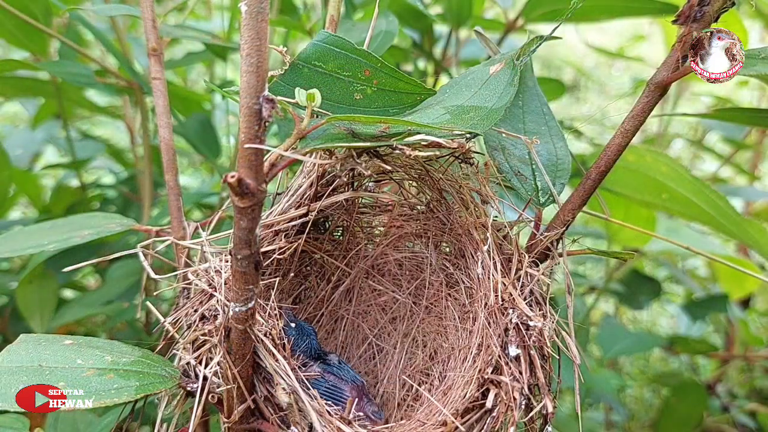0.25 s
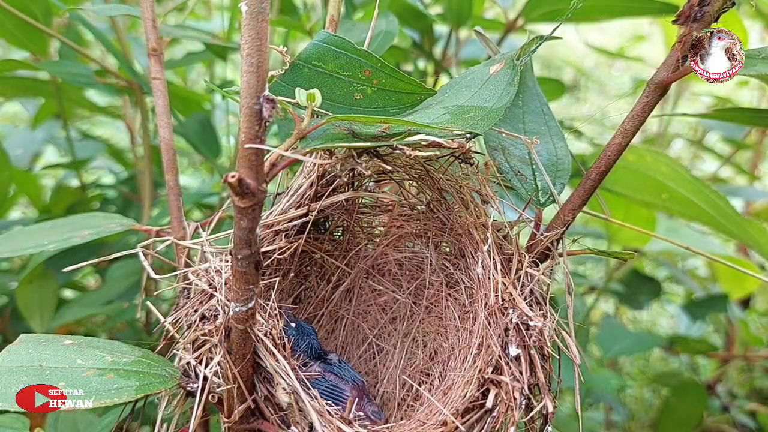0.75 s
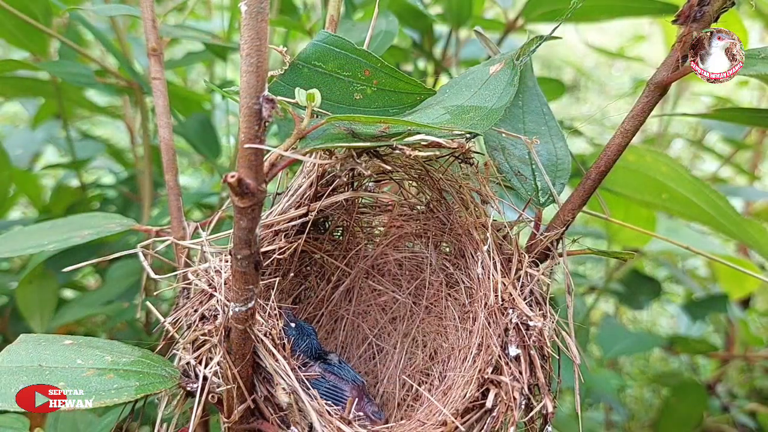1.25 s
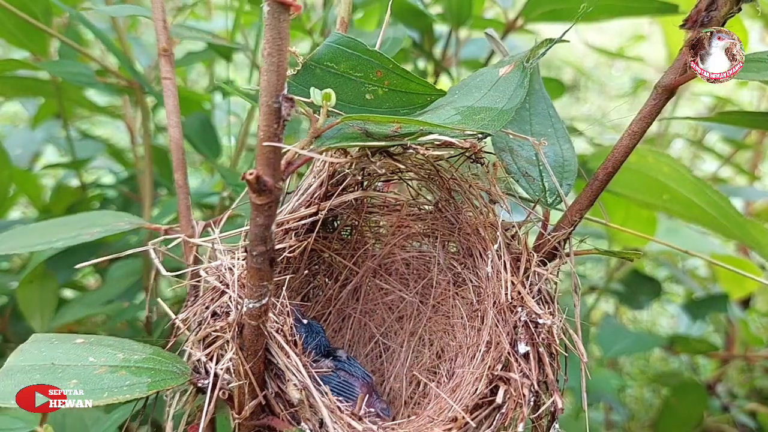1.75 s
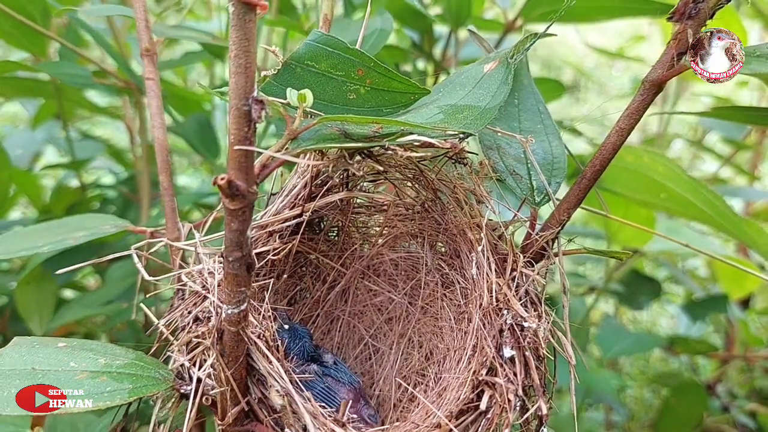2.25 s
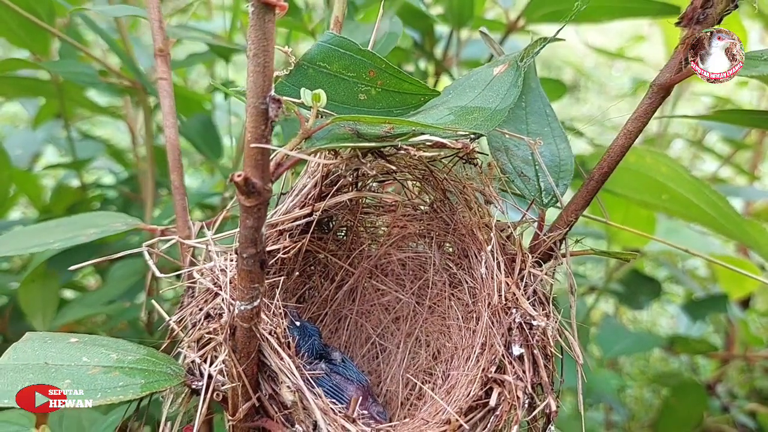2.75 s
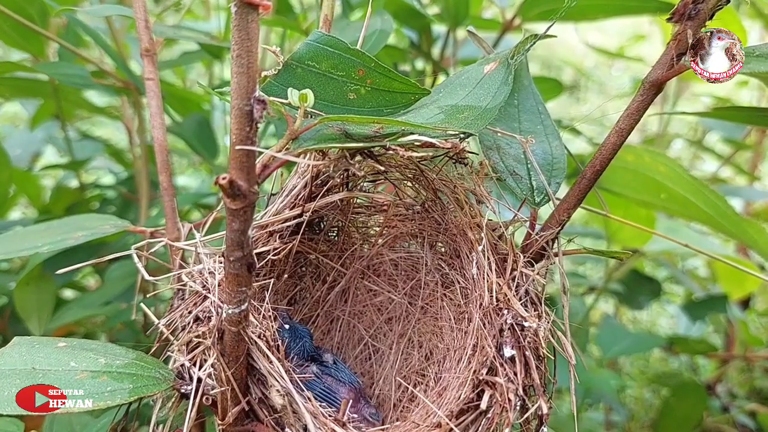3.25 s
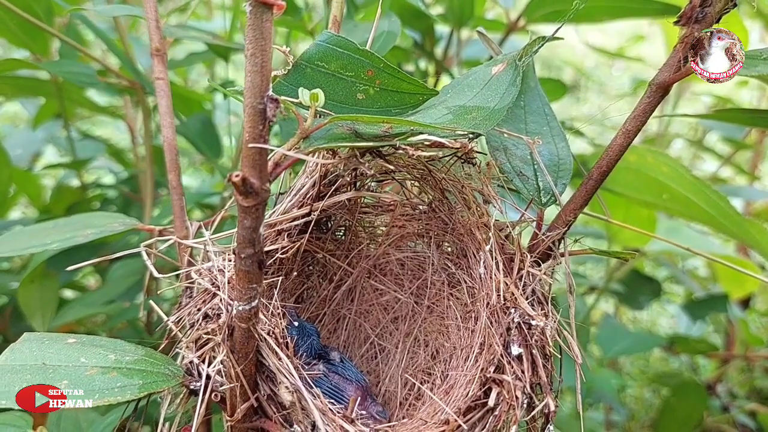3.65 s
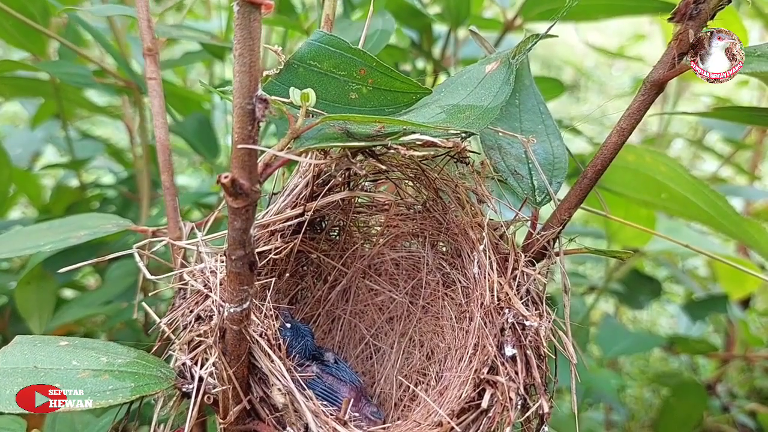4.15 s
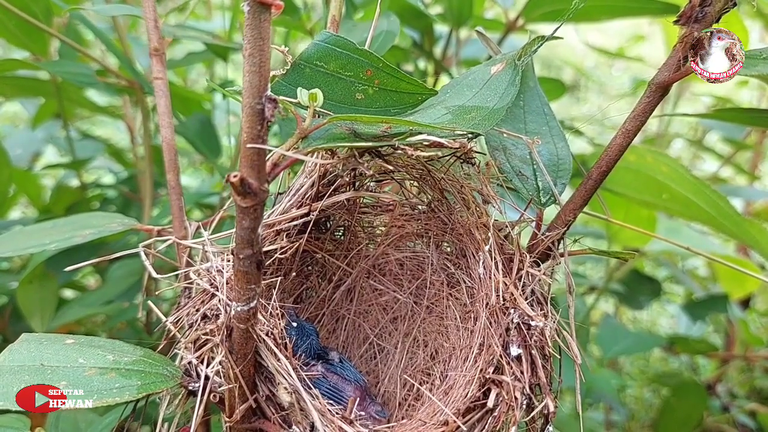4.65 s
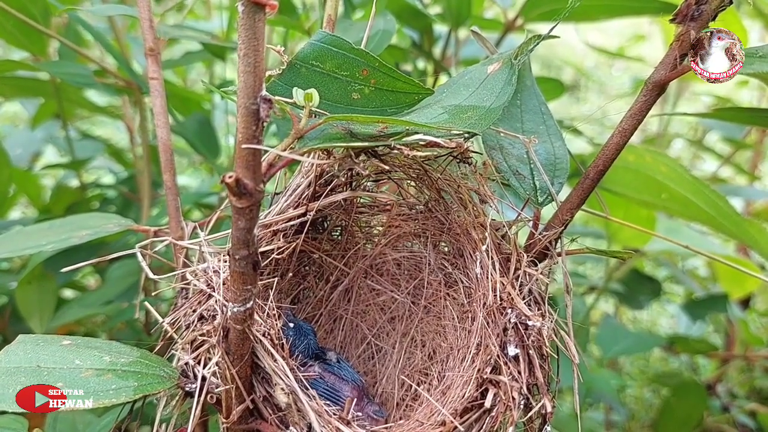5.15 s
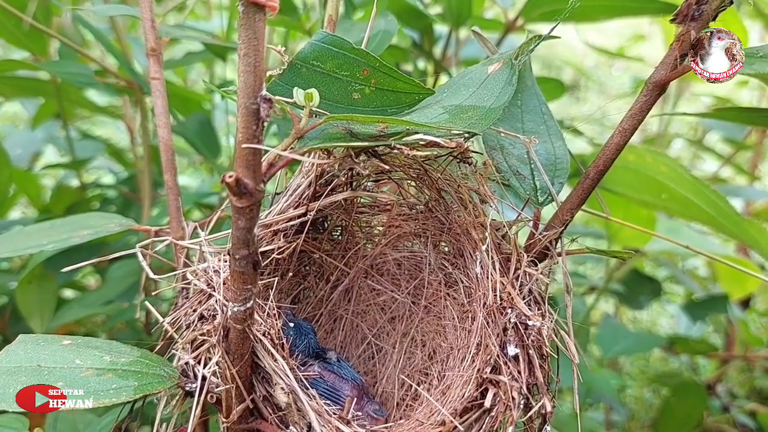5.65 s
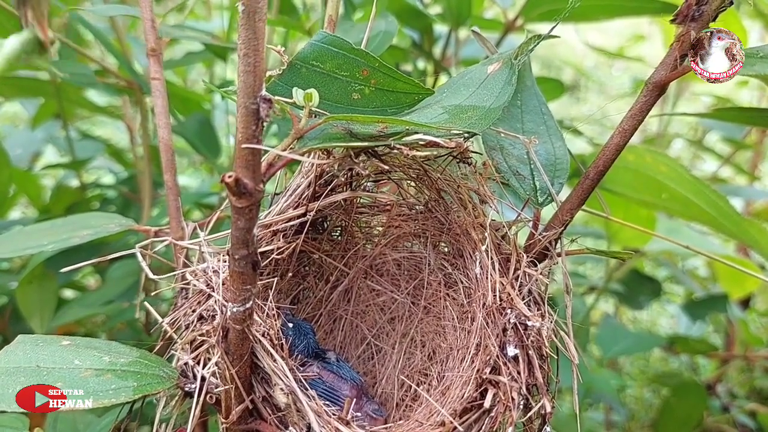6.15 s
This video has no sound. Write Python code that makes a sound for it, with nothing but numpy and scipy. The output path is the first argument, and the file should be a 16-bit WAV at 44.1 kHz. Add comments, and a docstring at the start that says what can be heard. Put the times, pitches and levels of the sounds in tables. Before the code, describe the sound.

In leafy forest undergrowth, crickets and katydids keep up a dense, shimmering drone. A bird repeats quick runs of high, soft chips throughout, and another slurs faintly downward far off. Early on, wings flutter close by and their draught thuds loudly on the microphone; the background dips, then slowly recovers. Short, mellow whistled notes follow in loose groups, echoing among the trees.

```python
"""Forest undergrowth: crickets and katydids drone, birds whistle short arched notes, others chip and slur.
Insects are gliding tone pulses over shaped noise; birds are sines along pitch paths with forest echo.
A small bird flutters past in noise puffs; its draught thumps on the microphone and rings the housing.
The recorder's gain control ducks by up to 12 dB, then recovers at 5 dB per second."""
import sys
import numpy as np
from scipy import signal
from scipy.fft import rfft, irfft, next_fast_len
from scipy.io import wavfile
from scipy.ndimage import uniform_filter1d

SR = 44100
rng = np.random.default_rng(int(sys.argv[2]) if len(sys.argv) > 2 else 0)


def bounce(signal):
    """Save signal as a 16-bit WAV file at the path given by the first command-line argument."""
    frames = np.transpose(np.atleast_2d(signal))
    limited = np.clip(frames, -1, 1)
    pcm = np.round(limited * 32767).astype(np.int16)
    wavfile.write(sys.argv[1], SR, pcm)


N = 281799
T = np.arange(N) / SR

# Nearby singers. Each row: carrier in Hz, glide either side of it in Hz, pulses per s, chirps per s,
# chirp depth 0-1, level before effort in dB.
NEAR_INSECTS = [(4360, -220, 58, 26, 0.87, -47.5), (4570, -300, 45.8, 22.9, 1, -49.5),
                (6740, 306, 66, 8.5, 0.4, -47), (7794, 243, 86.4, 21, 0.87, -46),
                (7755, 244.5, 61, 24.3, 1, -48), (8174, 195, 58, 17, 0.5, -51),
                (8810, -800, 110, 7.9, .95, -59.5), (12730, -300, 55, 25, .95, -65.5)]
# Spectra of the distant chorus. Each row: frequency in Hz, relative density in dB per Hz.
LOW_CHORUS_COLOUR = [(2900, -54.5), (3650, -21.5), (3980, -11), (4300, -7), (4850, -2.5), (5100, -19),
                     (5600, -26.5)]
HIGH_CHORUS_COLOUR = [(5000, -15.5), (5600, -16.5), (6250, -9), (6800, -8), (7150, -7), (7800, -4),
                      (8200, -5), (8450, -14.5), (9200, -19.5), (10000, -28.5)]
SHRILL_CHORUS_COLOUR = [(9000, -15.5), (9900, -12), (10700, -2.5), (11150, 0), (11550, -5), (12000, -19),
                        (13500, -20.5), (14400, -17), (15000, -15), (15900, -14.5)]
# How hard low and high insects sing. Each row: time in seconds, gain in dB.
LOW_EFFORT_CURVE = [(0, -4.5), (1.4, 2), (3.55, -2.2), (4.65, -1), (5.03, -3.5), (5.6, -1), (6.39, -0.5)]
HIGH_EFFORT_CURVE = [(.2, -4.5), (.35, 1), (.8, -2.5), (1.15, .3), (2.6, -2.7), (3.3, -0.8), (4.4, -4),
                     (6.39, -1)]
# Faint, low cricket trills. Each row: start in seconds, length in seconds, carrier in Hz, level in dB.
CRICKET_TRILLS = [(-.1, 3.45, 2086, -65.5), (4.503, 0.97, 2085, -72.5), (4.948, 0.82, 2330, -69.5),
                  (5.4, 0.49, 2080, -64.5)]
TRILL_FADE_S = 0.26


def insects():
    """Single singers stand out of a chorus that distance has blurred into hiss."""
    low_effort = gains(LOW_EFFORT_CURVE)[0]
    high_effort = gains(HIGH_EFFORT_CURVE)[0]
    low_chorus = from_db(-45) * noise(LOW_CHORUS_COLOUR)
    high_chorus = from_db(-45) * noise(HIGH_CHORUS_COLOUR)
    shrill_chorus = from_db(-52) * noise(SHRILL_CHORUS_COLOUR)
    out = low_effort * low_chorus + high_effort * (high_chorus + shrill_chorus)
    for *song, db in NEAR_INSECTS:
        effort = low_effort if song[0] < 5500 else high_effort
        out += effort * from_db(db) * insect(*song)
    for s, length_s, hz, db in CRICKET_TRILLS:
        fade = np.clip(np.minimum(T - s, s + length_s - T) / TRILL_FADE_S, 0, 1)
        trill = insect(hz, glide_hz=70, pulse_rate=95, chirp_rate=4.5, depth=0.2,
                       wander=0.06, detune=0.018, sharpness=1.5, echo_db=4.5)
        out += from_db(db) * fade * trill
    return out


def insect(hz, glide_hz, pulse_rate, chirp_rate, depth,
           wander=0.01, detune=0.005, sharpness=4.0, echo_db=-4):
    """Each wing stroke is a gliding tone pulse; strokes swell and fade in chirps."""
    clock_s = np.cumsum(1 + wander * drift(3)) / SR
    stroke = (clock_s * pulse_rate + rng.random()) % 1
    chirp_turns = clock_s * chirp_rate + rng.random()
    chirp = 1 - np.clip(depth, 0, 1) * (0.5 + 0.5 * np.cos(2 * np.pi * chirp_turns))
    pitch_hz = hz * (1 + detune * drift(25)) + 2 * glide_hz * (stroke - 0.5)
    tone = np.sin(2 * np.pi * np.cumsum(pitch_hz) / SR)
    song = rms_one(np.sin(np.pi * stroke) ** sharpness * chirp * tone)
    echo = rms_one(scatter(song, t60=0.13, build_s=0.0028))
    return rms_one(song + from_db(echo_db) * echo)


# Whistled notes. Each row: start in seconds, length in seconds, nominal top pitch in Hz,
# level before throat resonance and waver in dB.
WHISTLE_NOTES = [(2.379, 0.11, 1120, -39), (2.461, 0.042, 1125, -34), (2.619, 0.13, 1090, -51.5),
                 (2.731, 0.05, 1077, -43.5), (2.9, 0.1, 1080, -59), (3.725, 0.16, 1209, -33),
                 (3.879, 0.043, 1114, -30.5), (3.942, 0.034, 1035, -31.5), (4.013, 0.04, 1065, -30.5),
                 (4.099, 0.082, 1116, -34), (4.291, 0.079, 1126, -38), (4.85, 0.086, 1225, -42.5),
                 (4.919, 0.057, 1167, -38.5), (4.995, 0.043, 1040, -55), (5.094, 0.049, 1076, -51.5),
                 (5.184, 0.062, 1142, -44), (6.255, 0.13, 1170, -37.5), (6.371, 0.033, 1130, -34.5)]
# Phrases holding those notes. Each row: start in seconds, pitch the notes scoop up from in Hz,
# droop at a note's end in Hz, echo send in dB.
WHISTLE_PHRASES = [(2.3, 1040, 6.3, -3), (3.7, 942, 182, -20), (4.8, 1030, 62, -1), (6.2, 940, 34, -5.5)]


def whistlers(rise_s=0.0097, droop=3.35, waver_db=2, throat_hz=1000, throat_width_hz=55, throat_db=4):
    """Notes scoop up past a throat resonance, then droop; far birds carry more forest echo."""
    direct, sent = np.zeros(N), np.zeros(N)
    for s, length_s, top_hz, db in WHISTLE_NOTES:
        _, start_hz, droop_hz, echo_db = [phrase for phrase in WHISTLE_PHRASES if phrase[0] <= s][-1]
        t = T[:int(length_s * SR)]
        note_rise_s = min(rise_s + length_s / 9, length_s / 2)
        scoop = np.cos(np.pi / 2 * np.minimum(t / note_rise_s, 1) ** 3.17) ** 2
        fall = np.clip((t - note_rise_s) / (length_s - note_rise_s), 0, 1) ** droop
        pitch_hz = top_hz + (start_hz - top_hz) * scoop - droop_hz * fall
        pitch_hz = pitch_hz * (1 + 0.005 * drift(150)[:len(t)])
        throat_gain_db = throat_db * np.exp(-((pitch_hz - throat_hz) / throat_width_hz) ** 2)
        sound = from_db(db + throat_gain_db) * note(pitch_hz, edge_s=0.016)
        add(direct, s, sound)
        add(sent, s, sound * from_db(echo_db))
    leaves = from_db(-12) * scatter(direct, t60=0.16, build_s=0.0032)
    forest = scatter(sent, t60=0.76, build_s=0.0014)
    return direct * from_db(waver_db * drift(30)) + leaves + forest


# Runs of high chips. Each row: start in seconds, number of chips, last chip's nominal level in dB.
CHIP_SERIES = [(.185, 2, -42.5), (.486, 4, -41), (.974, 4, -41), (1.482, 4, -43), (1.954, 1, -40),
               (2.089, 3, -44), (2.487, 4, -44), (3.006, 4, -41), (3.559, 4, -41), (4.11, 3, -43),
               (4.524, 3, -42), (4.926, 4, -45), (5.435, 4, -51), (5.952, 4, -39.5)]
CHIP_EVERY_S, CHIP_S = 0.11, 0.048
SOFT_CHIP_DB = -46  # nominal, before the direct cut and echo
CHIP_RASP = 0.065  # share of the pitch


def chipping_bird():
    """Quick runs of equally soft falling chips, each closed by a chip with its own level."""
    calls = []
    for start_s, count, accent_db in CHIP_SERIES:
        *soft, last = beats(start_s, count, CHIP_EVERY_S)
        calls += [(s, CHIP_S, SOFT_CHIP_DB) for s in soft]
        calls.append((last, CHIP_S, accent_db))
    return falling_calls(calls, top_hz=6750, bottom_hz=5850, bend=1.3, rasp=CHIP_RASP, rasp_rate=1300,
                         swell_db=0, direct_db=-4, t60=0.15, build_s=0.0005)


# Far downward slurs. Each row: start in seconds, number of slurs, first and last nominal level in dB.
SLUR_RUNS = [(0.177, 3, -55.5, -53.5), (2.314, 6, -57.5, -60.5), (3.66, 1, -54, -55), (4.41, 1, -73.5, -62),
             (5.162, 4, -59, -53.5), (5.259, 1, -65.5, -55)]
SLUR_EVERY_S, SLUR_S = 0.293, 0.095
SLUR_RASP = 0.07  # share of the pitch


def slurring_bird():
    """Evenly paced falling slurs whose level moves steadily through each series."""
    calls = []
    for start_s, count, first_db, last_db in SLUR_RUNS:
        times_s = beats(start_s, count, SLUR_EVERY_S)
        levels_db = np.linspace(first_db, last_db, round(count))
        calls += [(s, SLUR_S, db) for s, db in zip(times_s, levels_db)]
    return falling_calls(calls, top_hz=4235, bottom_hz=2970, bend=2.8, rasp=SLUR_RASP, rasp_rate=900,
                         swell_db=1, direct_db=-11, t60=0.47, build_s=0.0025)


def falling_calls(rows, top_hz, bottom_hz, bend, rasp, rasp_rate, swell_db, direct_db, t60, build_s):
    """Raspy notes slide down, steadying and optionally swelling to the end, smeared by the canopy."""
    out = np.zeros(N)
    for s, length_s, db in rows:
        left = np.linspace(1, 0, int(length_s * SR))
        flutter = rasp * np.sqrt(left) * drift(rasp_rate)[:len(left)]
        glide_hz = bottom_hz + (top_hz - bottom_hz) * left ** bend
        pitch_hz = glide_hz * (1 + rng.normal(0, 0.008) + flutter)
        add(out, s, from_db(db - swell_db * (left - 1.5)) * note(pitch_hz, edge_s=0.024))
    return from_db(direct_db) * out + scatter(out, t60, build_s)


# Bursts of wingbeats. Each row: start in seconds, number of beats, first beat's level in dB.
WING_BURSTS = [(1.138, 2, -44.5), (1.375, 4, -36.5)]
WINGBEAT_EVERY_S, WINGBEAT_GROWTH_DB = 0.038, 3
# Spectra of wing puffs, feather rustle, draught and gust peak.
# Each row: frequency in Hz, relative density in dB per Hz.
WING_SPECTRUM = [(100, -11), (250, 5.5), (430, -3), (620, -14.5), (1000, -33), (2500, -25.5)]
FEATHER_SPECTRUM = [(150, 10.5), (400, -6), (800, -9.5), (1500, -14), (2300, -13.5), (5000, -24),
                    (10000, -19.5), (15000, -15)]
DRAUGHT_SPECTRUM = [(18, -28.5), (35, -8), (60, 3), (120, -2.5), (200, -15), (350, -26.5), (700, -51.5),
                    (1500, -68.5)]
BUFFET_SPECTRUM = [(100, -24), (250, 4), (380, 0), (620, -10), (1000, -20.5), (1600, -34), (3500, -54),
                   (8000, -70.5)]
# Swells of feather rustle and of draught. Each row: middle in seconds, width in seconds, level in dB.
RUSTLE_SWELLS = [(1.135, 0.072, -49.5), (1.47, .065, -46), (1.685, 0.039, -36.5)]
DRAUGHT_GUSTS = [(1.45, 0.12, -34), (1.636, 0.012, -21.5), (1.712, 0.018, 0), (1.83, .04, -28.5)]
# Sharp peak of the gust.
BUFFET_S, BUFFET_WIDTH_S, BUFFET_DB = 1.697, 0.0045, -1.5
# Housing modes set off by the gust. Each row: start in seconds, frequency in Hz,
# level before decay in dB, t60 in seconds.
HOUSING_MODES = [(1.663, 70, -1, 0.24), (1.694, 330, -1, 0.077), (1.709, 117, 8, 0.1)]


def fly_past():
    """Wingbeats puff, feathers rustle, and the draught buffets the microphone."""
    puffs = noise(WING_SPECTRUM)
    wings = np.zeros(N)
    for start_s, count, first_db in WING_BURSTS:
        for k, s in enumerate(beats(start_s, count, WINGBEAT_EVERY_S)):
            # each beat is louder as the bird nears
            wings += from_db(first_db + WINGBEAT_GROWTH_DB * k) * burst(puffs, s, width_s=0.0028)
    swirl = noise(DRAUGHT_SPECTRUM)
    steady_swirl = swirl / np.sqrt(uniform_filter1d(swirl ** 2, size=1000))
    buffet = from_db(BUFFET_DB) * burst(noise(BUFFET_SPECTRUM), BUFFET_S, BUFFET_WIDTH_S)
    draught = swells(DRAUGHT_GUSTS) * steady_swirl + buffet
    thud = sum(ring(*mode) for mode in HOUSING_MODES)
    rustle = swells(RUSTLE_SWELLS) * noise(FEATHER_SPECTRUM)
    return wings + draught + thud + rustle


def ring(s, hz, db, t60):
    """A damped resonance set off at one moment."""
    t = np.maximum(T - s, 0)
    decay = from_db(db - 60 * np.minimum(t / t60, 2))
    onset = 1 - np.exp(-2 * hz * t)
    return decay * np.sin(2 * np.pi * hz * t) * onset


# Twig spectrum. Each row: frequency in Hz, relative density in dB per Hz.
TWIG_SPECTRUM = [(300, -13), (800, 2), (1300, 5), (2200, -10), (6000, -23)]
TWIG_S, TWIG_DB = 0.709, -50


def twig():
    """A twig ticks: one very short puff of shaped noise."""
    return from_db(TWIG_DB) * burst(noise(TWIG_SPECTRUM), TWIG_S, width_s=0.0013)


# Spectra of still air, far rumble and drone. Each row: frequency in Hz, relative density in dB per Hz.
AIR_SPECTRUM = [(650, -36.5), (1500, -38.5), (2600, -39), (5000, -35), (15000, -60)]
RUMBLE_SPECTRUM = [(20, -34.5), (45, -6), (75, 0.5), (120, -2), (170, -16), (250, -19.5), (400, -33),
                   (650, -38.5)]
DRONE_SPECTRUM = [(105, 1), (140, -1.5), (175, -12), (330, -22)]
AIR_DB = -61.5
# Rumble level. Each row: time in seconds, level in dB.
RUMBLE_LEVEL = [(0, -47), (.5, -41.5), (1.2, -42), (2.4, -42), (3.5, -40.5), (4.7, -47), (6.39, -42)]
# Swell of a distant low drone. Each row: middle in seconds, width in seconds, level in dB.
DRONE_SWELL = [(3.8, 0.51, -47)]


def forest_air():
    """Steady shaped noise for air, drifting far rumble, and a low drone that swells once."""
    air = from_db(AIR_DB) * noise(AIR_SPECTRUM)
    rumble = gains(RUMBLE_LEVEL)[0] * noise(RUMBLE_SPECTRUM)
    drone = swells(DRONE_SWELL) * noise(DRONE_SPECTRUM)
    return air + rumble + drone


def from_db(db):
    """Decibels to gain."""
    return 10 ** (np.asarray(db) / 20)


def rms_one(x):
    """Scale to unit rms."""
    return x / np.sqrt(np.mean(x ** 2) + 1e-20)


def gains(rows):
    """Each dB column of a curve as a gain per sample."""
    s, *columns = np.transpose(rows)
    return [from_db(np.interp(T, s, column)) for column in columns]


def noise(colour):
    """Unit-rms noise with the given spectrum, falling 40 dB per octave beyond its ends."""
    hz, db = np.transpose(colour)
    size = next_fast_len(N)
    octave = np.log2(np.maximum(np.arange(size // 2 + 1) * SR / size, 1))
    beyond = np.abs(octave - np.clip(octave, np.log2(hz[0]), np.log2(hz[-1])))
    shape = from_db(np.interp(octave, np.log2(hz), db) - 40 * beyond)
    return rms_one(irfft(rfft(rng.standard_normal(size)) * shape, size)[:N])


def drift(rate):
    """Random wander through unit-spread knots, rate knots per second."""
    knots = rng.standard_normal(200)
    return np.interp(T * rate, np.arange(len(knots)), knots)


def scatter(x, t60, build_s):
    """Countless echoes off leaves and trunks build up, then die away."""
    t = T[:SR]
    echoes = rng.standard_normal(SR) * from_db(-60 * t / t60) * (1 - np.exp(-t / build_s))
    return signal.fftconvolve(x, echoes / np.sqrt(np.sum(echoes ** 2)))[:N]


def burst(carrier, s, width_s):
    """A bell-shaped puff of the carrier, scaled to rms 1 under the bell."""
    bell = np.exp(-0.5 * ((T - s) / width_s) ** 2)
    puff = carrier * bell
    return puff * np.sqrt(np.sum(bell ** 2) / np.sum(puff ** 2))


def swells(rows):
    """Gain per sample of bell-shaped swells."""
    return sum(from_db(db) * np.exp(-0.5 * ((T - s) / width_s) ** 2) for s, width_s, db in rows)


def beats(start_s, count, every_s):
    """Times of evenly paced repeats."""
    return start_s + every_s * np.arange(round(count))


def note(hz, edge_s):
    """A unit-rms sine along a pitch path, with soft ends."""
    t = T[:len(hz)]
    edge = np.sin(np.pi / 2 * np.clip(np.minimum(t, t[-1] - t) / edge_s, 0, 1)) ** 2
    return np.sqrt(2) * edge * np.sin(2 * np.pi * np.cumsum(hz) / SR)


def add(out, s, sound):
    """Mix a sound in at a time."""
    at = max(int(s * SR), 0)
    out[at:at + len(sound)] += sound[:max(N - at, 0)]


def scene():
    """Insects, birds, a twig's tick and the air of the forest, in one channel."""
    birds = whistlers() + chipping_bird() + slurring_bird() + fly_past()
    return (insects() + birds + twig() + forest_air())[None]


CUTOFF_HZ = 15450


def record(dry, threshold_db=-13, most_db=12, release_db_per_s=5.0, attack_s=0.05, top=1.0):
    """Gain control ducks on loud sound and recovers slowly; peaks are rounded, the top is cut."""
    level_db = 20 * np.log10(np.abs(dry[0]) + 1e-9)
    over_db = np.clip(level_db - threshold_db, 0, most_db)
    release_db = release_db_per_s * T
    held_db = np.maximum.accumulate(over_db + release_db) - release_db
    pole = np.exp(-1 / (attack_s * SR))
    ducked = dry * from_db(-signal.lfilter([1 - pole], [1, -pole], held_db))
    rounded = top * np.tanh(ducked / top)
    lowpass = signal.ellip(16, 0.1, 80, CUTOFF_HZ, fs=SR, output="sos")
    return signal.sosfilt(lowpass, rounded)


dry = scene()
out = record(dry)
bounce(out)
```